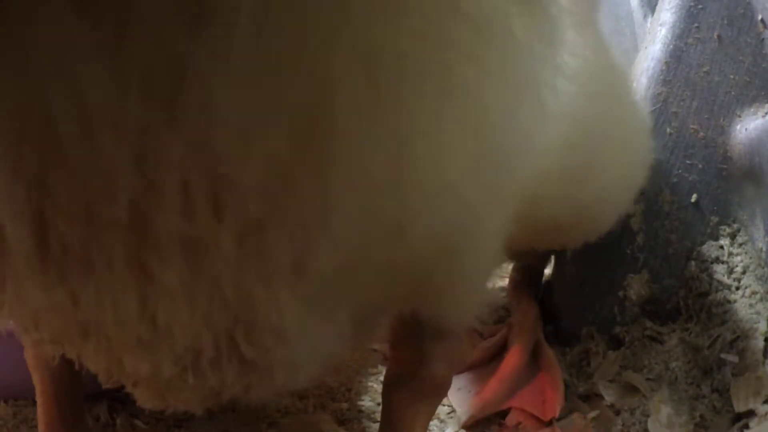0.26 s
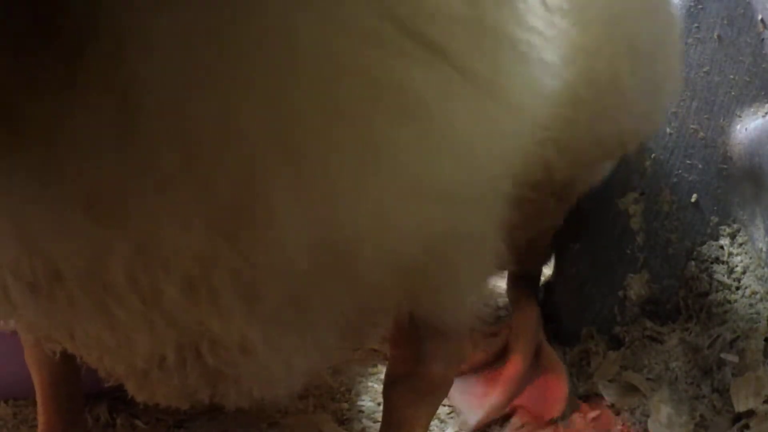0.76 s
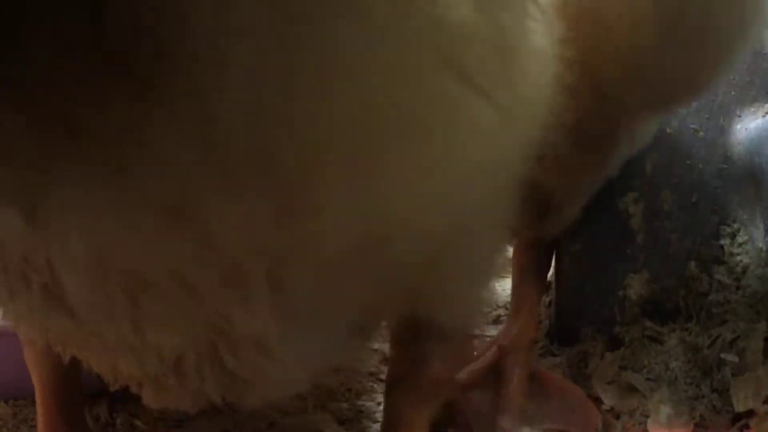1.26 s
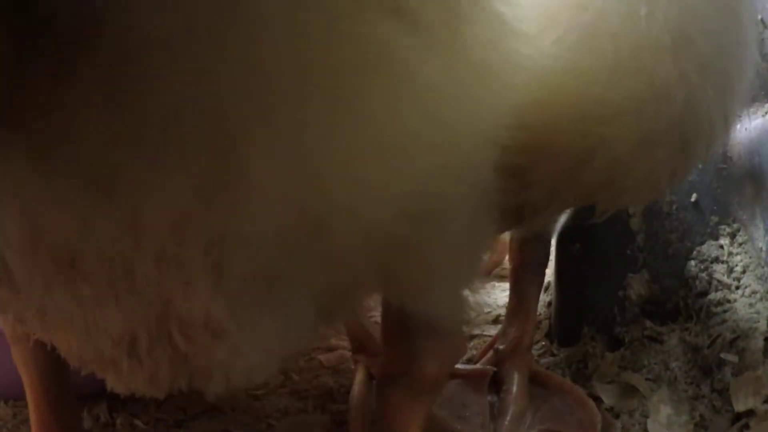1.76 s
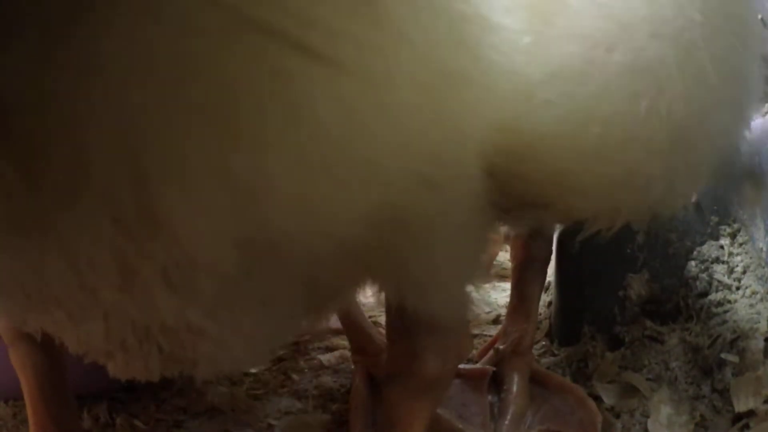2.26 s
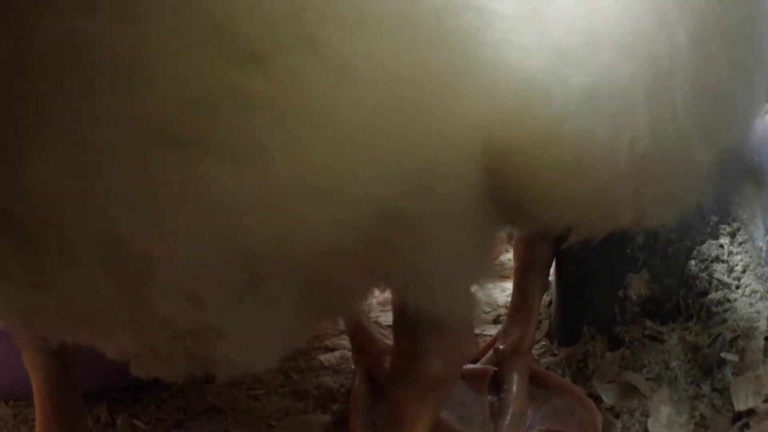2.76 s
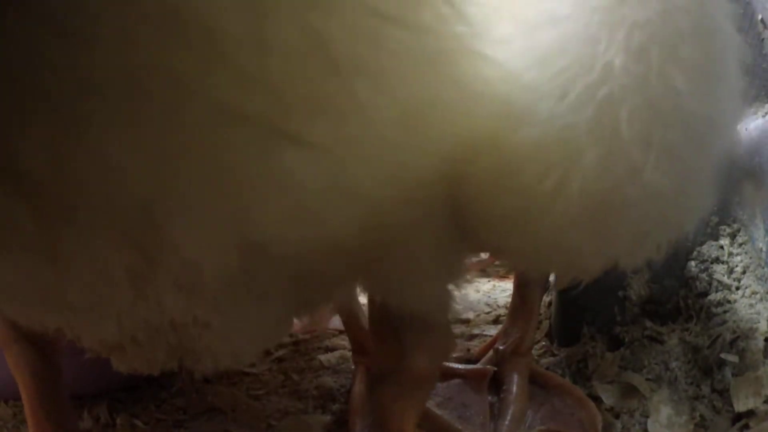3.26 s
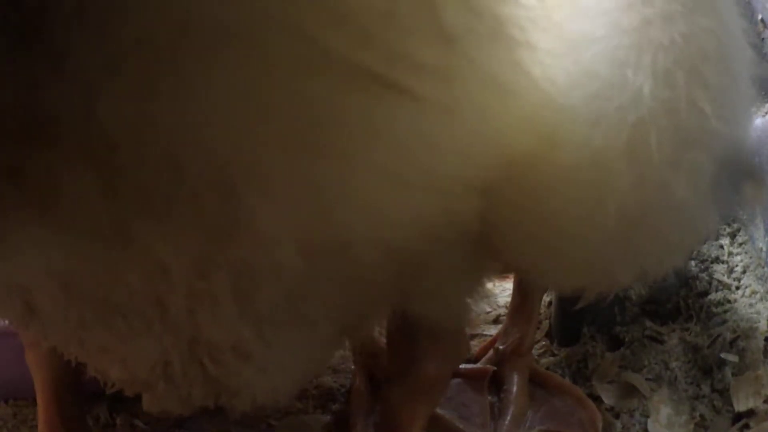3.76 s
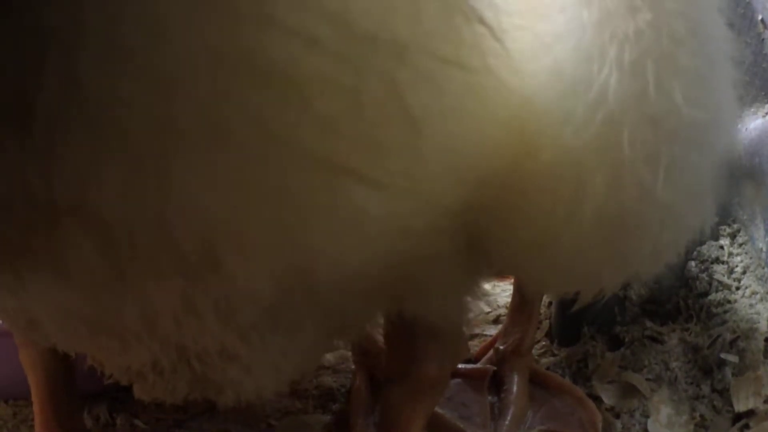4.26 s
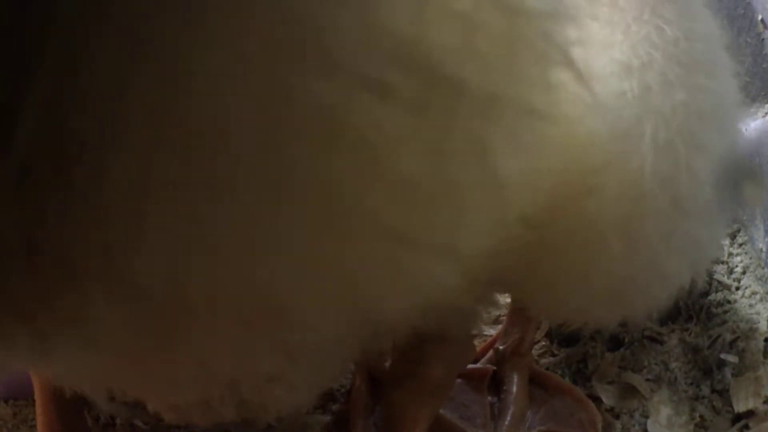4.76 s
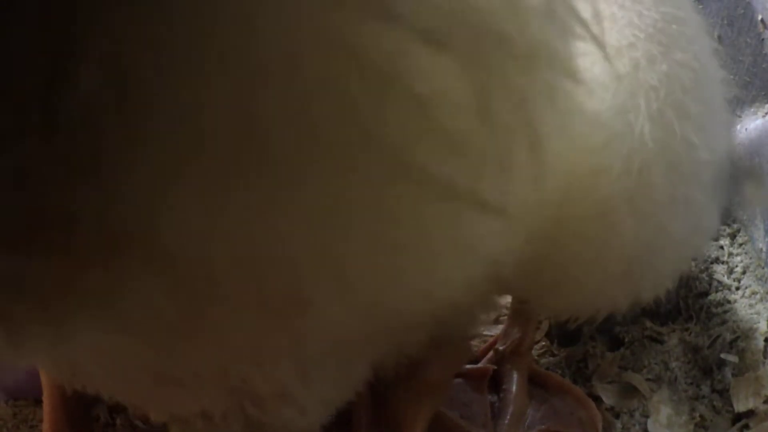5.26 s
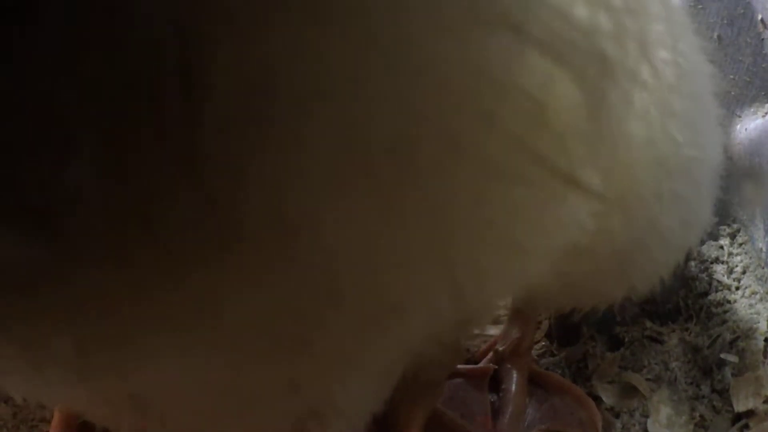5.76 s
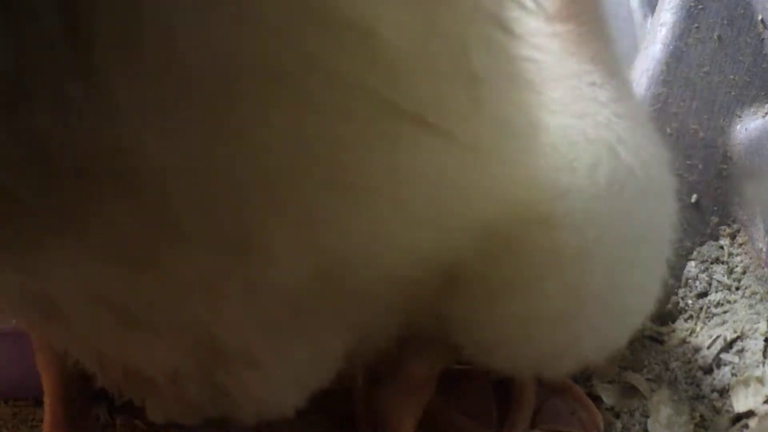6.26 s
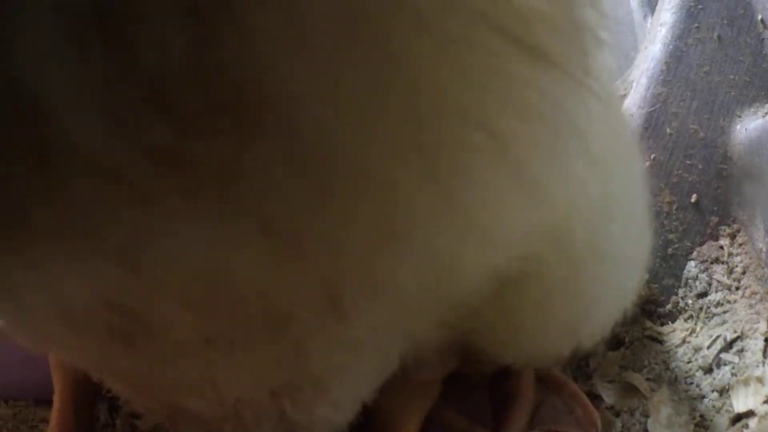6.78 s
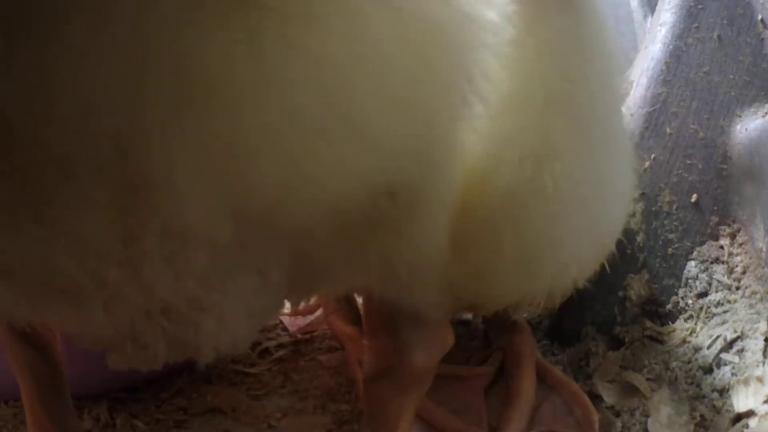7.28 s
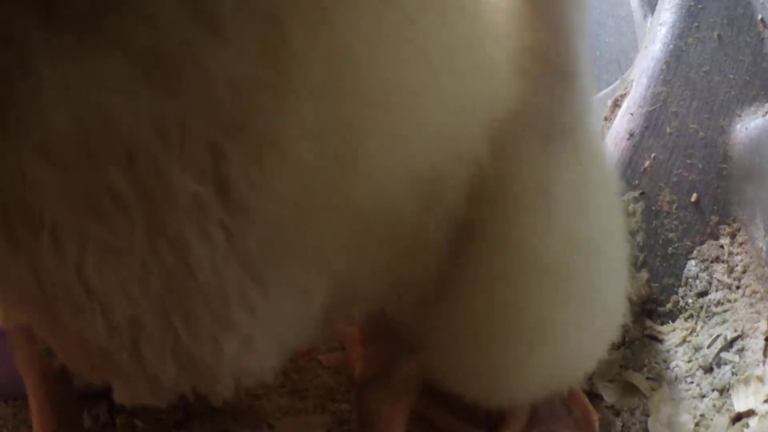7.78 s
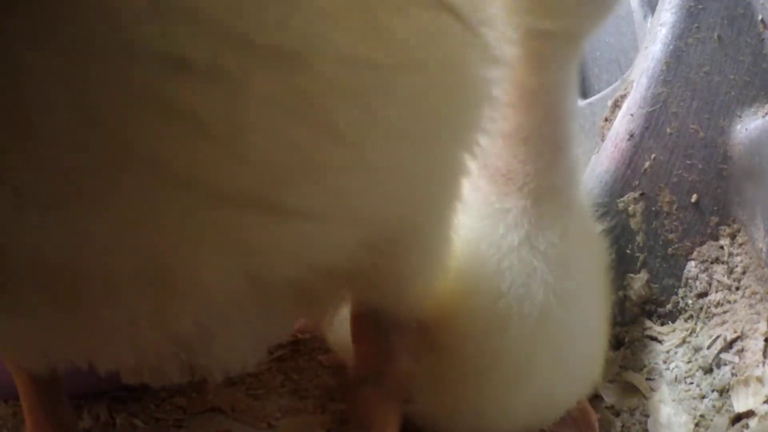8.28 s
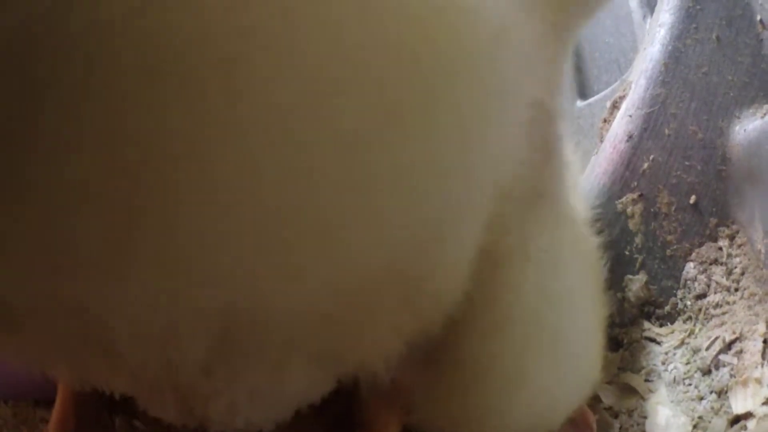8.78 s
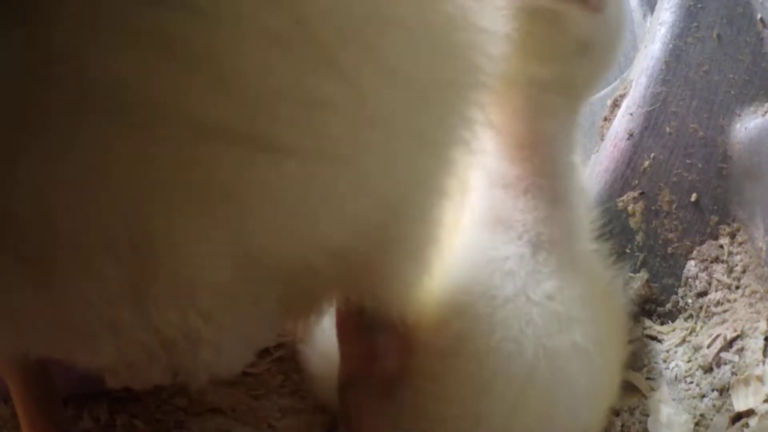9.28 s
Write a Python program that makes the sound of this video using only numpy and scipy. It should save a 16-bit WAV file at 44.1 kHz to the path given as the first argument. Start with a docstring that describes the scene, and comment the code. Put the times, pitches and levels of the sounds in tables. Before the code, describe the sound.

Dry, irregular clicks and scratchy rubs dominate, extremely close and wide in stereo, as fluffy young ducks press against the microphone. Short whistling peeps rise and fall in a small dry space, some rough and breaking. The middle has calmer moments of bedding rustle, then a violent snap near 3.4 seconds; the last third is busy ticking and scraping with no calls.

```python
"""Snaps and scrapes close up, with arched peeps, one short croak, soft bumps and a low scuffle of bedding.
Ducklings crowd against a small housing lying in wood shavings. Down and feet scrape and snap on it, which
shakes its two microphones in opposite senses and rings their ports: noise drives banks of resonances.
Peeps are gliding sines, the croak is a row of pulses through a throat, bumps are damped low sines with
bursts of noise, and the hiss and scuffle behind them are coloured, lumpy noise."""
import sys
import numpy as np
from scipy import signal
from scipy.fft import rfft, irfft
from scipy.io import wavfile
from scipy.ndimage import uniform_filter1d

SR = 44100
rng = np.random.default_rng(int(sys.argv[2]) if len(sys.argv) > 2 else 0)


def digitize_waveform(pressure):
    """Quantize a signal to 16-bit integers and store it at the path in sys.argv[1].

    Rows of a 2-D input are taken as channels; values are limited to [-1, 1].
    """
    field = np.atleast_2d(pressure).T
    bounded = np.clip(field, -1, 1)
    quanta = np.round(bounded * 32767).astype(np.int16)
    wavfile.write(sys.argv[1], SR, quanta)


N = 420273  # samples

# resonances of each microphone's port, the lowest first: (f/Hz, width/Hz, relative level/dB)
LEFT_PORT = [(5320, 1600, -5), (8300, 1170, 3), (10300, 7300, -32.5)]
RIGHT_PORT = [(4767, 673, 1.5), (7187, 2000, 7.5), (10860, 9400, -13)]

GRIP_DB = 5  # how unevenly a scrape grips the housing


def amp(db):
    """Decibels to gain."""
    return 10 ** (np.asarray(db) / 20)


def add(mix, s, sound):
    """Mixes a sound in at a time in seconds, cut off at the end of the mix."""
    part = mix[..., round(s * SR):][..., :np.shape(sound)[-1]]
    part += sound[..., :part.shape[-1]]


def panned(sound, pan_db):
    """Sets the left channel above the right by pan_db."""
    return sound * amp([[pan_db / 2], [-pan_db / 2]])


def ring(x, modes):
    """Parallel resonances, each passed twice for steep skirts; white noise leaves each at its row's level."""
    out = np.zeros(len(x))
    for hz, width, db in modes:
        r = np.exp(-np.pi * width / SR)  # pole radius: a wider resonance dies sooner
        section = [(1 - r * r) / 2, 0, (r * r - 1) / 2, 1, -2 * r * np.cos(2 * np.pi * hz / SR), r * r]
        level = amp(db) * 2 / np.sqrt(1 - r * r)
        out += level * signal.sosfilt([section, section], x)
    return out


def lumpy(size_s, depth_db):
    """A gain of unit RMS that jumps about: contact comes in grains."""
    z = uniform_filter1d(rng.standard_normal(N), max(round(size_s * SR), 1))
    gain = amp(depth_db * z / z.std())
    return gain / np.sqrt(np.mean(gain ** 2))


def ports(low, high):
    """Each port rings with partly its own noise: one drive for its lowest resonance, one for the upper ones."""
    a, b = rng.standard_normal((2, N))
    rung = []
    for noise, port in ((a, LEFT_PORT), (0.2 * a + .8 * b, RIGHT_PORT)):
        rung.append(ring(low * noise, port[:1]) + ring(high * noise, port[1:]))
    return np.array(rung)


def tinted(x, patch_db):
    """Each touch has its own colour: random patches of gain over time and pitch."""
    z = signal.stft(x, nperseg=256)[2]
    patches = rng.standard_normal(z.shape[:0:-1])  # time by pitch, shared by both channels
    patches = uniform_filter1d(patches, size=8, axis=0)
    patches = uniform_filter1d(patches, size=7, axis=1).T
    return signal.istft(z * amp(patch_db * patches / patches.std()), nperseg=256)[1][:, :N]


def background():
    """Hiss coloured by the ports, and a lumpy low scuffle: bedding noise partly opposed in the two channels."""
    # course of the room hiss and the scuffle of bedding: (t/s, hiss level/dB, relative scuffle level/dB)
    level_course = [(0, -62.5, -74.5), (0.899, -69, -78.5), (1.704, -60, -75.5), (2.101, -52, -68),
                    (2.701, -54.5, -64), (3.431, -52, -58.5), (3.468, -58.5, -74), (5.201, -59.5, -66),
                    (6.3, -66, -75.5), (6.949, -61.5, -61.5), (7.019, -58, -75), (8.2, -66.5, -74),
                    (8.897, -61, -64.5), (9.53, -58, -73)]
    # colour of the bedding: (f/Hz, relative level/dB)
    bedding = [(30, -26), (80, -5), (130, 1), (230, -4), (400, -5.5), (750, -5), (1700, -12), (3500, -17.5),
               (6000, -31)]
    s, hiss_db, scuffle_db = np.transpose(level_course)
    t = np.arange(N) / SR
    stir = lumpy(0.012, 6.64)
    c, d, e = rng.standard_normal((3, N))
    open_hiss = amp(-13.0) * uniform_filter1d(rng.standard_normal((2, N)), size=4)
    hiss = ports(stir, amp(-9.5) * stir) + open_hiss

    hz, db = np.transpose(bedding)
    log_hz = np.log(np.fft.rfftfreq(N, 1 / SR) + 1)
    colour = amp(np.interp(log_hz, np.log(hz), db))
    # low and high parts stir apart
    thuds = signal.lfilter(*signal.butter(2, 260, fs=SR), np.array([c, d]))
    rustle = [c, d] - thuds
    c, d = thuds * lumpy(.03, 4.5) + rustle * lumpy(.012, 4.6)
    # the shared noise enters with opposite signs, as a shake of the housing does
    scuffle = irfft(rfft(np.array([c + 0.097 * e, d - 0.1547 * e])) * colour, N)
    scuffle /= scuffle.std()
    return hiss * amp(np.interp(t, s, hiss_db)) + scuffle * amp(np.interp(t, s, scuffle_db) + 9.0)


def bumps():
    """Feet and bodies knock the floor: a few damped low cycles with a rumble and a puff of bedding."""
    # soft knocks: (t/s, relative level/dB, ring f/Hz)
    knocks = [(0.016, -14, 870), (0.251, -43, 375), (1.202, -49.5, 129), (2.023, -50, 305),
              (2.092, -49, 200), (2.822, -34, 426), (2.939, -30.5, 232), (2.95, -33.5, 223),
              (3.184, -36.5, 406), (3.223, -30.5, 184), (5.113, -42.5, 154), (5.377, -37, 396),
              (6.483, -47, 470), (6.564, -39, 458), (6.796, -43, 248), (6.982, -27, 170.4),
              (8.02, -47.5, 246), (8.75, -46.5, 250), (8.808, -44, 300), (8.965, -40, 484),
              (9.037, -35.5, 340), (9.086, -34, 368)]
    phase = .09  # radians, ahead on the left and behind on the right
    pan_db = -4  # left minus right
    out, t = np.zeros((2, N)), np.arange(round(.08 * SR)) / SR
    for s, db, hz in knocks:
        push = np.sin(2 * np.pi * hz * t + [[phase], [-phase]])
        push = push * np.exp(-t * hz / 1.5) * np.minimum(t / 0.00033, 1)
        # noise partly shared by the two channels
        dust = rng.standard_normal(len(t)) + .5 * rng.standard_normal((2, len(t)))
        noises = []
        for z in dust:
            rumble = ring(z * np.exp(-t * hz / 4.2), [(hz, hz, -14)])
            puff = ring(z * np.exp(-t / .004), [(3 * hz, 3 * hz, -8)])
            noises.append(rumble + puff)
        add(out, s, panned(amp(db) * (push + noises), pan_db))
    return out


def peep(start, rise, fall, top_hz, end_hz, bow, linger, rise_db, dip_db, fall_db, pan_db, rough):
    """A whistle that arches up and down; a rough one wavers, catches and carries breath."""
    # strength of the whistle by pitch: (f/Hz, level/dB)
    whistle = [(1500, -22), (2000, -4), (2500, -2), (3200, -5), (4000, -17), (4800, -15)]
    start_hz = 1610
    bow_share, linger_share = .22, .13  # of the pitch span
    top_s = 0.02  # time scale of the level change at the top of the arch
    fade_in_s, fade_out_s = .002, .008
    t = np.arange(0, rise + fall, 1 / SR)

    # pitch arch, its corners rounded
    up, down = np.clip(t / rise, 0, 1), np.clip((t - rise) / fall, 0, 1)
    climb = up + bow_share * bow * np.sin(np.pi * up)
    drop = down + linger_share * linger * np.sin(2 * np.pi * down)
    hz = start_hz + (top_hz - start_hz) * climb - (top_hz - end_hz) * drop
    hz = uniform_filter1d(hz, size=500, mode="nearest")
    turned = np.clip(.5 + (t - rise) / 0.038, 0, 1)  # crossing from rise to fall
    strain = abs(rough) * (1 - .85 * turned)  # the rise is the hoarser half
    quick, air, catch = rng.standard_normal((3, len(t)))
    hz = hz * (1 + .4 * strain * uniform_filter1d(air, size=50))
    turn = 2 * np.pi * np.cumsum(hz) / SR

    db = rise_db + (fall_db - rise_db) * turned + np.interp(hz, *np.transpose(whistle))
    db += dip_db * np.exp(-((t - rise) / top_s) ** 2)
    db -= 130 * strain * abs(uniform_filter1d(catch, size=200))  # the voice catches and breaks
    shaken = 1 + 4 * strain * uniform_filter1d(quick, size=30)
    breath = rough * amp(max(rise_db, fall_db) - 23.0) * ring(air, [(2300, 1300, 0.0088)])
    breath = breath * np.sin(np.pi * t / (rise + fall))
    fade = np.clip(np.minimum((rise + fall - t) / fade_out_s, t / fade_in_s), 0, 1)
    pair = []
    for side in (.5, -.5):  # the whistle lags by one radian in the right microphone
        a = turn + side * 1.0
        tone = np.sin(a) * shaken + amp(-16.0) * np.sin(2 * a)
        pair.append(amp(side * pan_db) * fade * (np.sqrt(2) * amp(db) * tone + breath))
    return np.array(pair)[:, max(round(-start * SR), 0):]  # a call begun before time zero loses its head


def croak():
    """A short row of pulses that swells, then fades, rung by the resonances of the throat."""
    # the croak: (t/s, pulse period/s, relative level/dB)
    start, period, db = (6.8665, .0027, -21)
    # throat resonances: (f/Hz, width/Hz, relative level/dB)
    throat = [(384, 430, 8), (1090, 590, 6), (1940, 530, 6)]
    swell, fade = 1.66, 1.34  # growth power, decay in pulses
    pulses = np.zeros(N)
    beat = np.arange(6)  # the first has no strength
    at = np.round((start + beat * period) * SR).astype(int)
    pulses[at] = 2 * beat ** swell * np.exp(-beat / fade)
    return amp(db) * ring(uniform_filter1d(pulses, size=9), throat)


def voices():
    """Peeps lifted near the lowest port resonance, plus the croak; all dulled above it, with the pen's echo."""
    # peeps: (t/s, rise/s, fall/s, top f/Hz, end f/Hz, bow of the rise/0 to 1, linger of the fall/signed share,
    #         relative rise level/dB, change at the top/dB, relative fall level/dB, left minus right/dB,
    #         roughness/0 to 1)
    calls = [(-.05, 0.03, 0.036, 3230, 2270, 0.57, 0.47, -30, -8.5, -10, 0.5, 0.1),
             (0.561, 0.035, 0.042, 2695, 1860, .8, 0.082, -63, -7, -61.5, 2, 0.1),
             (1.748, 0.038, 0.059, 2750, 1580, .9, 1.5, -65.5, -11, -50, 10.5, 0.2),
             (1.842, 0.025, 0.038, 2080, 1760, 1, -0.33, -56.5, 2, -58, 2, 0),
             (1.996, 0.042, 0.042, 2600, 1820, 0.87, -0.058, -56, -9, -53.5, -1, 0),
             (2.405, .04, 0.034, 2710, 1620, .6, -0.12, -51.5, -17, -49, 0, 0.1),
             (2.818, 0.042, 0.041, 4470, 1635, 0.02, -1.8, -33, -32, -36.5, -4, 0.57),
             (2.998, 0.042, 0.042, 5000, 1650, .4, -0.7, -32.5, -2, -39.5, 2.5, 0.66),
             (3.188, .036, 0.031, 4890, 1660, 0, -0.19, -26, 1, -28, 2, 0.87),
             (3.982, 0.051, 0.059, 3480, 1480, 1, 0.92, -45, 1.5, -35.5, 1, 0),
             (5.38, 0.044, 0.061, 3480, 1724, 1, 0.89, -39, 0.5, -31.5, 3.5, 0),
             (5.635, 0.042, 0.042, 4510, 1660, 0.4, -0.059, -36.5, -3, -43, 4.5, 0.4),
             (5.972, 0.05, 0.048, 4330, 1580, 0.35, -1.4, -50, 8, -51.5, 6, 0.4),
             (6.208, 0.056, 0.061, 3900, 1460, 0.8, -0.6, -40, 6, -41, 3, 0.2),
             (6.68, 0.04, 0.051, 3064, 1350, 0.4, 0.13, -32, -6.5, -30.5, 13, 0.17),
             (6.865, 0.041, 0.05, 3560, 1800, 0.96, -1.3, -33.5, -21, -40, -1, 0.2)]
    out = np.zeros((2, N))
    for row in calls:
        add(out, max(row[0], 0), peep(*row))
    out += amp(-8) * np.array([ring(out[0], LEFT_PORT[:1]), ring(out[1], RIGHT_PORT[:1])])
    out += croak()
    out = signal.sosfilt(signal.butter(8, 5600, fs=SR, output="sos"), out)
    t = np.arange(round(0.015 * SR)) / SR
    echo = rng.standard_normal((2, len(t))) * amp(-60 * t / 0.27) * (t > .002)
    echo /= np.linalg.norm(echo[0])
    return out + amp(-11.0) * signal.oaconvolve(out, echo, axes=1)[:, :N]


def scrape_drives():
    """Strokes along the housing as grainy gains: one for the lowest port resonance, one for the upper ones."""
    # scrapes: (t/s, length/s, drive level/dB, drive of the upper port resonances re level/dB)
    strokes = [(0.0, 0.071, -40.5, -20), (0.116, 0.056, -35.5, -15.5), (0.18, 0.055, -33.5, -16),
               (.241, .028, -34, -16.5), (0.393, 0.027, -42, -18), (0.449, 0.016, -35, -13),
               (0.478, 0.037, -46.5, -29), (0.644, 0.033, -53, 3.5), (1.023, 0.028, -37.5, -11.5),
               (1.12, 0.019, -35, -10.5), (1.146, 0.052, -51, -12), (1.26, 0.016, -38, -20),
               (1.406, 0.018, -50, -6), (1.481, 0.089, -47.5, -7.5), (1.81, 0.019, -47, -3.5),
               (2.12, 0.17, -52.5, -17), (2.271, 0.14, -54, -10), (2.484, 0.031, -41, -10.5),
               (2.545, 0.091, -45, -9.5), (3.45, 0.062, -45.5, -24), (3.567, 0.052, -40.5, -25),
               (3.625, .024, -38, -12), (3.666, 0.021, -43, -11), (3.713, 0.022, -35.5, -11.5),
               (3.767, 0.097, -44, -14), (3.97, 0.081, -46.5, -16), (4.097, 0.033, -43, -6),
               (4.138, 0.044, -31, -18), (4.181, 0.073, -41, -20), (4.316, 0.093, -39, -19),
               (4.394, 0.17, -52.5, -6.5), (4.752, 0.028, -37, -7), (4.908, 0.058, -40, -16),
               (4.975, 0.04, -50.5, -15), (5.036, 0.018, -38, -11.5), (5.114, 0.02, -33, -8.5),
               (5.219, 0.057, -34, -16.5), (5.276, 0.067, -45, -11), (5.421, 0.061, -37.5, -34),
               (5.526, 0.025, -50.5, -11), (5.587, 0.13, -48.5, -19.5), (5.852, 0.045, -41, -12),
               (5.911, 0.037, -41.5, -36), (5.956, 0.039, -34.5, -9.5), (6.078, 0.017, -42.5, -14.5),
               (6.958, 0.052, -29.5, -12), (7.131, 0.032, -44.5, -20), (7.293, 0.052, -38, -14.5),
               (7.612, 0.089, -44.5, -15), (7.814, 0.042, -51, -22), (7.862, 0.11, -45.5, -15.5),
               (8.015, 0.043, -44.5, -14.5), (8.314, 0.043, -47, -18.5), (8.401, 0.012, -38.5, -10.5),
               (8.439, 0.063, -39, -11.5), (8.547, 0.025, -33, -9.5), (8.572, .029, -31.5, -1.5),
               (8.749, 0.014, -38, -11), (8.803, 0.035, -35.5, -19.5), (8.864, 0.055, -36.5, -17.5),
               (8.976, 0.031, -42, -9), (9.02, 0.035, -35.5, -2.5), (9.084, 0.032, -36.5, -11),
               (9.171, 0.033, -33, -16), (9.19, 0.086, -40.5, -19), (9.286, 0.052, -31, -21),
               (9.356, 0.068, -45, -19), (9.429, 0.058, -43, -8), (9.517, 0.01, -37.5, -8.5)]
    fade_db = -2  # a scrape bites, then slackens
    scrape, bright = np.zeros((2, N))
    for s, length, db, bright_db in strokes:
        stroke = amp(db + np.linspace(0, fade_db, round(length * SR)))
        add(scrape, s, stroke)
        add(bright, s, stroke * amp(bright_db))
    # stray ticks, about 260 a second, each dying over 1 ms
    ticks = rng.uniform(.3, 1.5, N) * (rng.random(N) < 260 / SR)
    slips = 0.4 + 1.3 * signal.lfilter([1], [1, -np.exp(-1 / (0.001 * SR))], ticks)
    grain = lumpy(0.005, 2.37) * slips
    return [uniform_filter1d(z, size=70) * grain for z in (scrape, bright)]


def snap_drives():
    """Sudden bursts with a short tail, as gains for the ports, the shaken housing and the top octave."""
    # snaps on the housing: (t/s, drive level/dB, shake of the housing re level/dB)
    snap_rows = [(0.0155, -2.5, -5.5), (.036, -22, 2), (.052, -8.5, -14.5), (0.0944, -33, 0),
                 (0.119, -26, -11), (.1874, -26.5, -12), (0.278, -23.5, -13), (0.3409, -21.5, -6),
                 (0.348, -18, -13), (0.3713, -24, 0), (0.44, -11.5, -7), (0.4779, -18.5, -14),
                 (0.9604, -5, -13.5), (1.003, -29.5, -13), (1.0324, -25, -3.5), (1.069, -31, -5.5),
                 (1.094, -27.5, -12), (1.1766, -30, 5.5), (1.198, -16, -15), (1.2068, -18.5, -6),
                 (1.2133, -16, -10), (1.2282, -17, -8.5), (1.2864, -24, -1.5), (1.3011, -20.5, -10),
                 (1.321, -37, -7), (1.335, -25, -14), (1.3639, -32.5, -12), (1.465, -37, -11),
                 (1.81, -40, -7), (2.2792, -16, -6.5), (2.289, -41, -11), (2.3074, -20.5, -10),
                 (2.317, -13, -20), (2.337, -11.5, -13), (3.447, -4, -3.5), (3.4578, -1, -22),
                 (3.6431, -26.5, -8), (3.738, -29.5, -19), (3.84, -17.5, -19.5), (3.967, -23.5, -8.5),
                 (4.1028, -24.5, -29), (4.249, -33.5, 2), (4.374, -28, -7), (5.16, -16.5, -19),
                 (5.195, -33, -10), (5.2343, -10.5, -22.5), (5.3271, -13, -9.5), (5.3809, -8, -13),
                 (5.458, -13.5, -16), (5.509, -24.5, -4), (5.61, -31.5, -5), (5.767, -19, -1),
                 (5.7798, -15, -24), (5.8098, -9, -12), (5.8393, -24.5, 2), (5.8812, -18.5, -15),
                 (5.8903, -25.5, -0.5), (6.0133, -23, -13), (6.0214, -17, -24), (6.187, -42.5, 3),
                 (6.96, -11.5, -3), (6.9827, -13, 5.5), (7.0016, -24, -5), (7.075, -16.5, -8),
                 (7.1331, -17.5, -4.5), (7.151, -26, 0), (7.1639, -19, -5), (7.1976, -19, -3),
                 (7.2288, -26.5, 4), (7.258, -20.5, -7), (7.3737, -21, -7.5), (7.41, -23, -15),
                 (7.4364, -17, -12.5), (7.4566, -14.5, -6.5), (7.4927, -10, -17), (7.5793, -28.5, -5),
                 (7.639, -28, -13), (7.675, -10, -16.5), (7.7324, -25.5, -8.5), (7.742, -28, -19),
                 (7.756, -37, -13), (7.7704, -26, -8.5), (7.801, -36, -8), (7.8276, -22, -3.5),
                 (8.0211, -28, -8), (8.627, -24, -13), (8.6546, -29.5, -16), (8.6957, -30, -4),
                 (8.7559, -34, -24), (8.804, -23, -7.5), (8.858, -19.5, -15), (8.9646, -20, -8),
                 (8.971, -25.5, 0), (9.012, -26, -9), (9.038, -18, -34), (9.0872, -19.5, -2),
                 (9.0942, -13.5, -11), (9.1191, -21, -5), (9.201, -29, -12), (9.23, -22.5, -14),
                 (9.291, -23, -1), (9.309, -20, -9.5), (9.391, -20, -13), (9.4094, -17, -24),
                 (9.436, -23.5, -0.5), (9.448, -26, -8)]
    # hard cracks that reach the top octave: (t/s, drive level/dB)
    cracks = [(0.0172, -9), (.441, -27), (0.9612, -29), (3.449, -13.5), (5.327, -34), (5.38, -24),
              (5.8102, -21.5), (6.96, -15.5), (6.9846, -15.5), (7.674, -33), (9.0934, -19), (9.436, -29.5)]
    snap, shake, top = np.zeros((3, N))
    t = np.arange(round(.015 * SR)) / SR
    burst = np.exp(-(t / .0018) ** 2) + amp(-18) * np.exp(-t / .005)
    burst = np.minimum(t / .0003, 1) * burst
    for s, db, shake_db in snap_rows:
        add(snap, s, amp(db) * burst)
        add(shake, s, amp(db + shake_db) * burst)
        add(top, s, amp(db - 28.5) * burst)
    for s, db in cracks:
        add(top, s, amp(db) * burst)
    return snap, shake, top


def contact():
    """Scrapes and snaps ring the ports and shake the housing, plus on the left and minus on the right."""
    # resonances of the shaken housing: (f/Hz, width/Hz, relative level/dB)
    housing = [(388, 493, -8), (1660, 1700, -3.5), (2993, 3400, 0.5)]
    scrape, bright = scrape_drives()
    snap, shake, top = snap_drives()
    c, d, e = rng.standard_normal((3, N))

    varied = lumpy(.04, 4)  # some snaps are brighter than others
    low_drive = amp(4.0) * scrape + amp(-4.0) * snap
    high_drive = amp(5.5) * bright + amp(-17) * snap * varied
    rung = ports(low_drive, high_drive)

    body_drive = amp(-3) * scrape * lumpy(0.042, GRIP_DB) + amp(-4.0) * shake
    body = ring(body_drive * c, housing)
    body = signal.sosfilt(signal.butter(6, 4400, fs=SR, output="sos"), body)
    sharp = [ring(top * d, [(14500, 2900, -10)]), ring(top * e, [(14200, 4700, -4)])]
    # a snap lands nearer one side, at random
    nearer = np.sign(np.log(lumpy(0.053, 0.46)))
    lean = (0.11 + 0.26 * np.tanh(shake / (scrape + 1e-4))) * nearer
    shaken = np.array([(1 + lean) * body, (lean - 1) * body])
    # the touched wall itself, alike in both channels
    wall_drive = (scrape + snap * amp(-8.5)) * lumpy(0.029, GRIP_DB)
    rung += ring(wall_drive * d, [(3610, 3000, -14)])
    return tinted(rung, patch_db=3.0) + shaken + sharp


def scene():
    """Everything at the two microphones."""
    return background() + bumps() + voices() + contact()


def record(dry):
    """Bass roll-off, a notch between the left port's resonances, full-scale clipping and the band limit."""
    edge_hz = 16700
    thin = signal.sosfilt(signal.butter(2, 80, "high", fs=SR, output="sos"), dry)
    thin[0] = signal.lfilter(*signal.iirnotch(6100, 7, SR), thin[0])
    band = signal.firwin(511, edge_hz, window=("kaiser", 9), fs=SR)
    return signal.oaconvolve(np.clip(thin, -1, 1), band[None], "same")


dry = scene()
out = record(dry)
digitize_waveform(out)
```